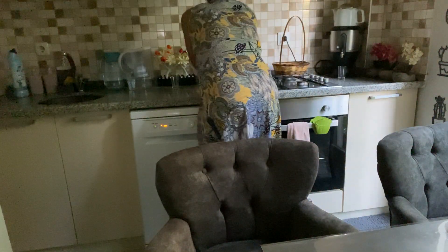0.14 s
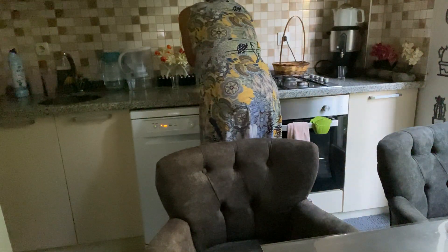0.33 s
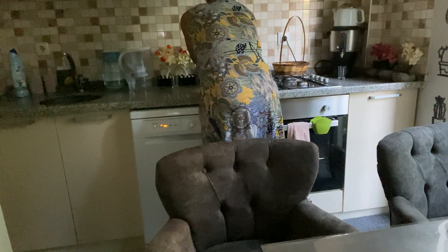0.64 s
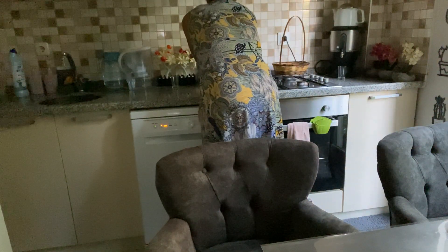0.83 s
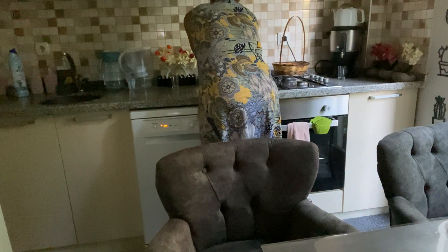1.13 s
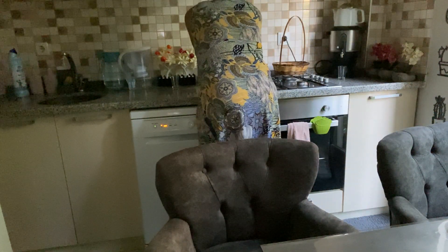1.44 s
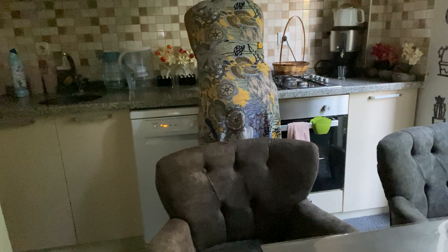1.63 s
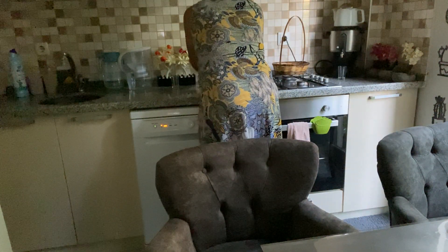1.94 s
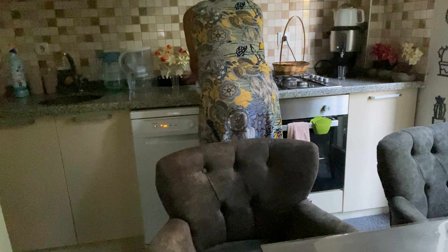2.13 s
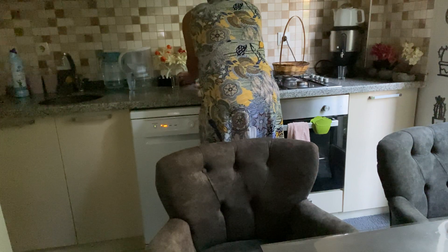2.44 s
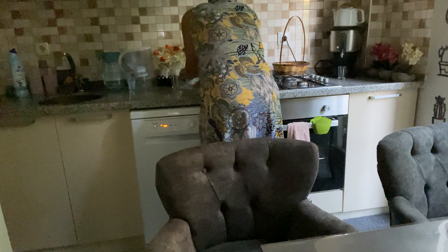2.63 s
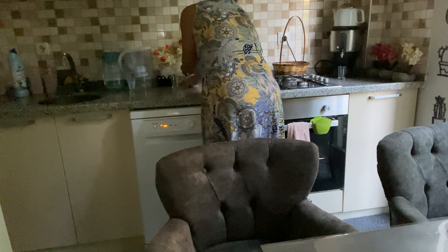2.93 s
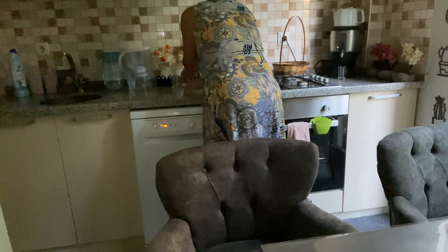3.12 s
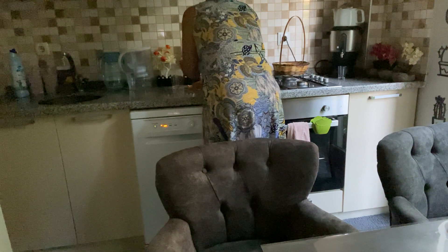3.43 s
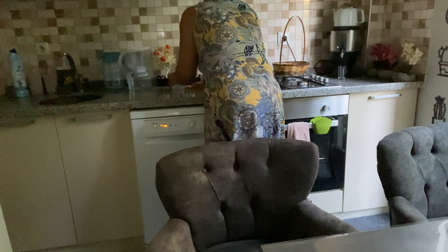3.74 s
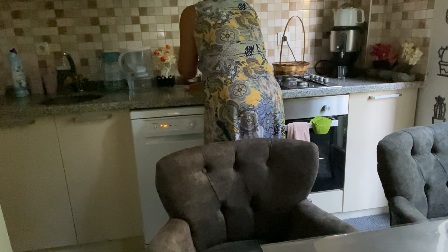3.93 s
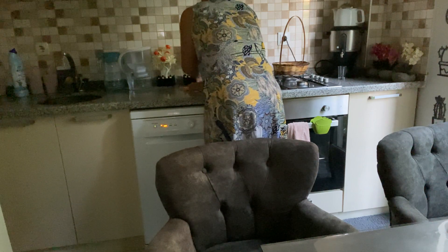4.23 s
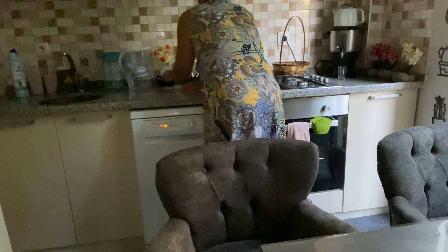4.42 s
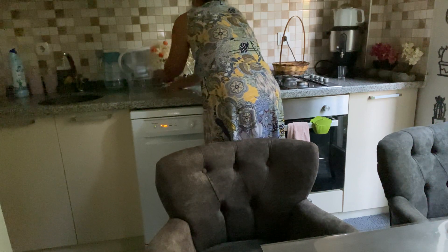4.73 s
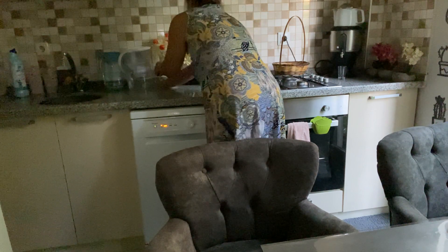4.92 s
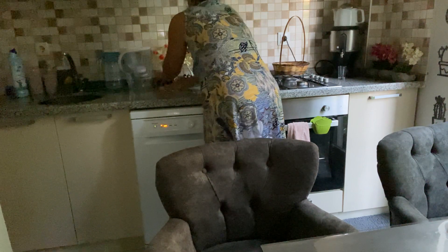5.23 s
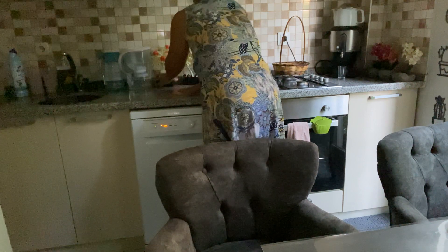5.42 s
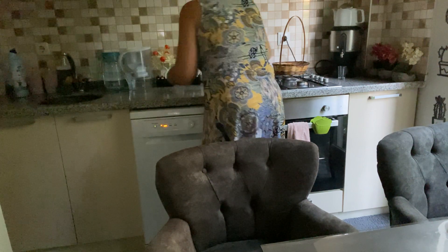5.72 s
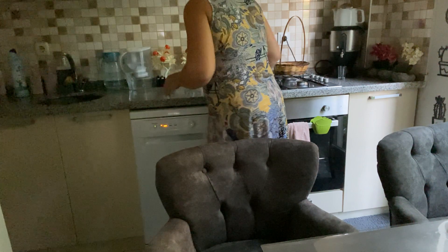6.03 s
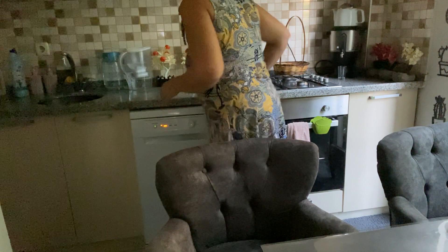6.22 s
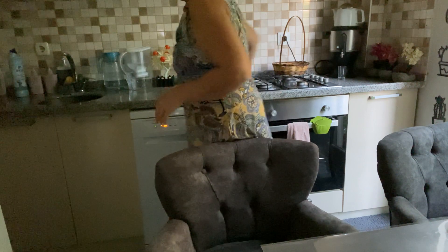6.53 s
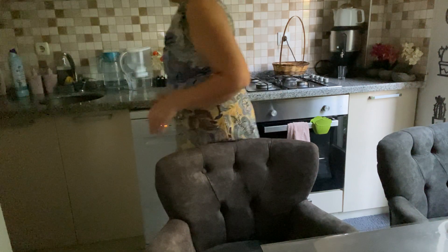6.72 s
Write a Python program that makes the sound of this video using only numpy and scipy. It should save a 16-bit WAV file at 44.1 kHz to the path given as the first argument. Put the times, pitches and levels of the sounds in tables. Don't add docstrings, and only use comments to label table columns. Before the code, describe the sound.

Someone puts kitchenware on a stone counter: first a faint door bump and sharp tray knocks, then a quick run of plastic tub taps, a quiet gap, a bowl's clattering landing, a loud sharp plate crack and several woody board knocks. The end is nearly still. Short bright tile echoes, thin sliding scrapes, light cloth rustle and a low motor hum surround it, picked up by a phone some distance away.

```python
import sys
import numpy as np
from scipy import signal
from scipy.fft import rfft, irfft, next_fast_len
from scipy.io import wavfile

SR = 44100
rng = np.random.default_rng(int(sys.argv[2]) if len(sys.argv) > 2 else 0)


def volts(x):
    e = np.asarray(x, float) / 20
    return 10 ** e


def store_pcm(level_fs):
    pcm = np.round(np.clip(level_fs, -1, 1) * 32767).astype(np.int16)
    wavfile.write(sys.argv[1], SR, np.atleast_2d(pcm).T)


N = 303011

# start_s, peak_db, thud_db and edge_db (re middle), contact_ms
DOOR_KNOCKS = [
    (0.005, -29.5, 1, -31.5, 2.1),
    (0.059, -52, -10, -39, 8.7),
]
TRAY_KNOCKS = [(0.184, -15, -8.5, -11, 0.91), (0.284, -18.5, -1.5, -8.5, 1.82),
               (0.309, -28.5, -1, -40, 2.63), (0.494, -30.5, 7.5, -12, 1.9), (0.654, -41.5, 13, -23, 1.68),
               (0.845, -47.5, 15.5, -13, 1.6), (0.907, -45.5, -8, -2.5, 6.3), (1.105, -42, -2.5, -33, 3.2),
               (1.403, -63, 16.5, 10, 1.8)]
TUB_KNOCKS = [(1.573, -42.5, 15.5, -8.5, 1.5), (1.612, -41.5, 2, -28, 1.74), (1.718, -28, 0.5, -15, 2),
              (1.77, -32, 5, -15, 1.51), (1.803, -23, -6, -7.5, 1.12), (1.844, -32.5, -3, -12.5, 8),
              (1.875, -28, -1.5, -11, 3), (1.909, -37.5, -20, -13, 2.1), (1.962, -36, 2, -27, 1.98),
              (2.647, -48, 12, -6, 1.8), (2.67, -53, 4, -3, 2.74), (2.726, -55, 8, -46, 1.23)]
BOWL_KNOCKS = [
    (3.192, -17.5, -2, -15.5, 1.1),
    (3.212, -17.5, -38, -32, 1.42),
    (3.249, -24, 3, -12, 4.2),
    (3.277, -18, -20, -8, 1.1),
    (3.289, -20, -8, -22, 1.1),
]
CUP_KNOCKS = [
    (3.746, -47, -15.5, -1, 4),
    (3.759, -43, -10, -10.5, 3),
]
PLATE_KNOCKS = [
    (4.129, -34, -13, -3, 4.3),
    (4.137, -7, -8, -7, 1.29),
    (4.147, -5.5, -8.5, -6.5, 1.5),
]
BOARD_KNOCKS = [(5.26, -38, -22, -15.5, 10), (5.279, -19.5, -1, -18, 1.27), (5.341, -18, -4, -19.5, .7),
                (5.416, -28, -7, -24, 1.2), (5.499, -33, -3, -21.5, 1.2), (5.507, -42.5, 10.5, -24, 2.5),
                (5.834, -57.5, -3, -15, 8.7), (6.522, -52.5, -6, -28, 1.4)]
# pitch_hz, level_db (per Hz)
DOOR_COLOUR = [(53, -52), (90, -41), (150, -7), (190, -25), (799, -33.5), (10200, -51.5), (12100, -39),
               (15000, -88)]
TRAY_COLOUR = [(88, -31), (150, 5.5), (364, 18), (556, 18), (714, 15), (936, 10), (1570, -9.5),
               (12600, -54), (15000, -52.5)]
TUB_COLOUR = [(88, -44.5), (150, 1.5), (337, 9), (1350, 2.5), (2060, -10), (3890, -21), (10400, -60.5),
              (12400, -65), (15000, -85)]
BOWL_COLOUR = [(88, -23), (150, -5), (273, 21.5), (742, 13), (1050, 4.5), (1950, 0), (7210, -37),
               (10600, -51.5), (15000, -49.5)]
CUP_COLOUR = [(470, -40.5), (800, -12.5), (1710, -7.5), (3340, -21.5), (3840, -19), (9000, -61),
              (11700, -92), (19800, -120)]
PLATE_COLOUR = [(59, -36.5), (100, -8.5), (633, 1), (1050, -11.5), (1140, -4), (1590, -8), (3840, -9.5),
                (8880, -29), (10500, -114), (15000, -66.5)]
BOARD_COLOUR = [(71, -36), (120, -4), (380, 12.5), (546, 3), (887, -3), (1090, 1), (1470, -4), (8020, -36),
                (15000, -88)]
# pitch_hz, level_db, t60_s
DOOR_MODES = [(160.3, -7.5, 0.54), (302, -10.5, 0.1), (484, -18, 0.13)]
TRAY_MODES = [(441, -4, .04), (540, -2, .05), (620, -1, .06), (818, -5, .04), (1211, -2, .04),
              (1400, -12, .02), (3155, -25, .02)]
TUB_MODES = [(395, -2, .04), (575, -6, .03), (780, -4, .035), (930, -3, .035), (1204, -6, .03),
             (1400, -5, .035), (1900, -11, .025)]
BOWL_MODES = [(339, 3, .04), (732, -6, .045), (915, 1, .045), (1950, -10, .025), (2300, -13, .025),
              (4350, -26, .012)]
CUP_MODES = [(1120, 5, .04), (1710, -5, .025), (2778, -20, .02), (3770, -10, .04)]
PLATE_MODES = [(165, -15, .08), (526, -7, .04), (646, -8, .04), (931, -11.5, .04), (1144, 9, .08),
               (1238, -3, .1), (1766, -12, .04), (2603, -13, .03), (3139, -17, .05), (3750, -14, .05),
               (3773, -6, .09), (4275, -14, .04), (5145, -18, .04)]
BOARD_MODES = [(387, -9, .025), (668, -5, .03), (880, -2, .035), (972, -5, .03), (1450, 0, .025),
               (1850, -4, .025), (2110, -10, .03), (3600, -26, .015)]
# pitch_hz, t60_s
ROOM_DECAY = [(125, 0.45), (500, 0.27), (2000, .31), (5000, 0.31), (12000, 0.28)]
# start_s, length_s, pitch_hz, width_hz, level_db
SLIDES = [(.7, .5, 3080, 250, -70), (4.48, .17, 3100, 300, -83), (5.92, .09, 3300, 900, -68),
          (2.77, .035, 4400, 300, -74), (2.02, .45, 1250, 500, -60), (.12, .07, 5000, 150, -69),
          (.08, .11, 3100, 300, -64), (.4, .7, 2300, 500, -69)]
# start_s, length_s, rustle_db
MOVES = [(0, 0.56, -72.5), (0.383, .15, -96), (0.617, 0.31, -80), (0.783, 0.96, -79.5),
         (1.553, 0.36, -73.5), (2.537, 0.32, -72), (2.84, 0.22, -79), (3.144, 0.16, -70.5),
         (3.95, .25, -89), (4.541, 0.62, -77), (5.162, 0.4, -73), (5.693, 0.506, -75), (6.45, .6, -70)]
# pitch_hz, level_db (per Hz)
RUSTLE_COLOUR = [(1180, -34.5), (2000, -8), (5830, -12.5), (7380, -14.5), (7980, -13), (9090, -15.5),
                 (16000, -23.5)]
# pitch_hz, level_db (per Hz)
AIR_COLOUR = [(180, -34), (300, -13), (393, -9), (422, -14), (743, -13), (951, -17.5), (1320, -21),
              (1650, -25), (5000, -52.5), (6500, -76), (11000, -120)]
# pitch_hz, level_db (per Hz)
RUMBLE_COLOUR = [(15, -43), (25, -30), (54, 2.5), (113, -4), (131, -11), (166, -6.5), (242, -5.5),
                 (299, -15.5), (343, -15.5), (500, -20), (650, -45), (1100, -120)]
# pitch_hz, width_hz, level_db
HUM = [(118.6, 8, -52.5), (298.4, 4, -58), (722, 15, -63.5), (4160, 5, -94.5)]
# pitch_hz, likeness (0-1), right_lag_turns
PORTS = [(60, .92, 0), (300, .75, 0), (700, .15, .2), (1000, .25, .42), (2400, .2, .45), (3800, .4, 1),
         (5500, .3, 1.45), (6600, .5, 1.82), (8000, .97, 2), (10400, .98, 2.49), (13000, .98, 3),
         (15400, .98, 3.5)]

STILL_DB = -85.5


def knocks(events, colour, modes, crack_db, gain_db, tick_db):
    t = np.arange(9000) / SR
    out = np.zeros(N + len(t))
    bands_hz = (700, "low"), ([700, 2200], "band"), ([2200, 9500], "band"), (9500, "high")
    registers = [signal.butter(2, hz, kind, fs=SR, output="sos") for hz, kind in bands_hz]
    for start_s, peak_db, thud_db, edge_db, contact_ms in events:
        push = chatter(t, contact_ms)
        sound = volts(crack_db) * coloured(push[None], colour)[0]
        strength_db = rng.normal(0, 3.5, len(modes))
        for (hz, mode_db, t60), change_db in zip(modes, strength_db):
            sound = sound + volts(mode_db + change_db) * ring(push, hz, t60)
        at = round(start_s * SR)
        parts_db = thud_db, 0, edge_db, edge_db + tick_db
        for k, (register, part_db) in enumerate(zip(registers, parts_db)):
            sign = (-1) ** k
            part = rms_one(signal.sosfilt(register, sound))
            out[at:at + len(t)] += sign * volts(peak_db + part_db + gain_db) * part
    return out[:N]


def chatter(t, contact_ms):
    push = (t == 0) * 1.
    for share, keep in rng.uniform([.1, .3], [1, .6], (3, 2)):
        lag = 2 + int(share * np.clip(contact_ms, .3, 20) * SR / 1000)
        rebound = np.zeros(lag + 1)
        rebound[[0, lag]] = 1, keep
        push = signal.lfilter(rebound[::-1], rebound, push)
    return push


def ring(push, hz, t60):
    r, w = volts(-60 / (t60 * SR)), 2 * np.pi * hz / SR
    return signal.lfilter([0, np.sin(w)], [1, -2 * r * np.cos(w), r * r], push + 1e-18)


def kitchen(x, direct_db, build_ms, early_db, early_ms, shade):
    t, tail = np.arange(int(.6 * SR)) / SR, 0
    edges = np.geomspace(40, 18000, 14)
    for low, high in zip(edges, edges[1:]):
        sos = signal.butter(2, [low, high], "band", fs=SR, output="sos")
        band = signal.sosfilt(sos, rng.standard_normal((2, len(t))))
        hz = np.sqrt(low * high)
        build = 1 - np.exp(-t * 1000 / (build_ms * np.sqrt(1000 / hz)))
        tail = tail + band * build * volts(-60 * t / at_hz(ROOM_DECAY, hz))
    near = 1 + volts(early_db) * np.exp(-t * 1000 / early_ms)
    tail = tail * near / np.sqrt(SR / 40)
    tail[:, :2] = volts(direct_db) * np.array([1, -shade])
    first, last = np.flatnonzero(x)[[0, -1]]
    heard = signal.fftconvolve(x[None, first:last + 1], tail, axes=1)
    return np.pad(heard, [(0, 0), (first, N)])[:, :N]


def slides():
    out, t = 0, np.arange(N) / SR
    for start_s, length_s, hz, width_hz, db in SLIDES:
        t60 = 2.2 / width_hz
        swell = np.sin(np.pi * np.clip((t - start_s) / length_s, 0, 1))
        squeak = ring(ring(rng.standard_normal((2, N)), hz, t60), hz, t60)
        out = out + volts(db) * swell * rms_one(squeak)
    return out


def movement_db():
    rise_s, fall_s = 0.23, .15
    t, power = np.arange(N) / SR, volts(2 * STILL_DB)
    for start_s, length_s, db in MOVES:
        rise = np.clip((t - start_s) / rise_s + .5, 0, 1)
        fall = np.clip((start_s + length_s - t) / fall_s + .5, 0, 1)
        power = power + volts(2 * db) * (rise * fall) ** 2
    return 10 * np.log10(power)


def room_air_db(rustle_db):
    t = np.arange(N) / SR
    stir_db = 10 * np.exp(-t / 0.036)
    settle_db = 9.5 * np.exp(-t / 1.6)
    return -59 + stir_db + settle_db + .15 * (rustle_db - STILL_DB)


def hiss(colour, patchy_db):
    noise = coloured(rng.standard_normal((2, N)), colour)
    return rms_one(noise * volts(patchy_db * drift(3.6)))


def appliances():
    out, t = 0, np.arange(N) / SR
    for hz, width_hz, db in HUM:
        wander = np.cumsum(rng.standard_normal((2, N)), axis=1) * np.sqrt(2 * np.pi * width_hz / SR)
        level = volts(db + 4.0 + 0.58 * drift(4.3))
        out = out + level * np.sin(2 * np.pi * hz * t + wander)
    return out


def coloured(x, colour):
    size = 4096
    hz = np.arange(size // 2 + 1) * SR / size
    cepstrum = irfft(np.log(volts(at_hz(colour, hz))))
    cepstrum[1:size // 2] *= 2
    cepstrum[size // 2 + 1:] = 0
    response = irfft(np.exp(rfft(cepstrum)))
    return signal.fftconvolve(x, np.atleast_2d(response), axes=1)[:, :x.shape[1]]


def drift(rate_hz):
    steps = rng.standard_normal(int(N / SR * 40) + 3)
    r = np.exp(-2 * np.pi * rate_hz / 40)
    slow = rms_one(signal.lfilter([1], [1, -r], steps))
    return np.interp(np.arange(N) / SR * 40, np.arange(len(steps)), slow)


def at_hz(points, hz, column=1):
    points = np.array(points)
    return np.interp(np.log(np.maximum(hz, 1)), np.log(points[:, 0]), points[:, column])


def rms_one(x):
    return x / np.sqrt(np.mean(x ** 2) + 1e-30)


def scene():
    objects = (
        knocks(DOOR_KNOCKS, DOOR_COLOUR, DOOR_MODES, crack_db=59, gain_db=-13, tick_db=-18),
        knocks(TRAY_KNOCKS, TRAY_COLOUR, TRAY_MODES, crack_db=31, gain_db=-14.5, tick_db=-17.5),
        knocks(TUB_KNOCKS, TUB_COLOUR, TUB_MODES, crack_db=36, gain_db=-15, tick_db=-20),
        knocks(BOWL_KNOCKS, BOWL_COLOUR, BOWL_MODES, crack_db=29, gain_db=-18, tick_db=-11.5),
        knocks(CUP_KNOCKS, CUP_COLOUR, CUP_MODES, crack_db=40, gain_db=-16, tick_db=-37),
        knocks(PLATE_KNOCKS, PLATE_COLOUR, PLATE_MODES, crack_db=41, gain_db=-19.5, tick_db=-25),
        knocks(BOARD_KNOCKS, BOARD_COLOUR, BOARD_MODES, crack_db=34, gain_db=-14.5, tick_db=-9.5))
    dishes = sum(kitchen(x, direct_db=-4, build_ms=1.2, early_db=-8.5, early_ms=25, shade=.6)
                 for x in objects)
    rustle_db = movement_db()
    rustle = volts(rustle_db + 5) * hiss(RUSTLE_COLOUR, patchy_db=.4)
    air = volts(room_air_db(rustle_db) + 3) * hiss(AIR_COLOUR, patchy_db=.4)
    rumble = volts(-49.5) * hiss(RUMBLE_COLOUR, patchy_db=-1.4)
    return dishes + slides() + rustle + air + rumble + appliances()


def low_pass(x):
    return signal.sosfilt(signal.butter(12, 16380, fs=SR, output="sos"), x)


def record(dry):
    size = next_fast_len(N + 4096)
    left, own = rfft(dry, size)
    hz = np.arange(len(left)) * SR / size
    alike = np.clip(at_hz(PORTS, hz), 0, .999)
    turns = np.interp(hz, *np.array(PORTS)[:, [0, 2]].T)
    shared = alike * left * np.exp(-2j * np.pi * turns)
    right = shared + np.sqrt(1 - alike ** 2) * own
    x = irfft(np.array([left, right]), size)[:, :N]
    x = signal.sosfilt(signal.butter(2, 40, "high", fs=SR, output="sos"), x)
    ceiling = 1.2
    mix = ceiling * np.tanh(x / ceiling)
    return low_pass(mix)


dry = scene()
out = record(dry)
store_pcm(out)
```